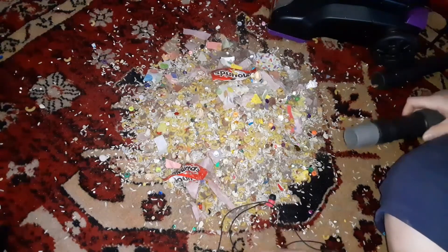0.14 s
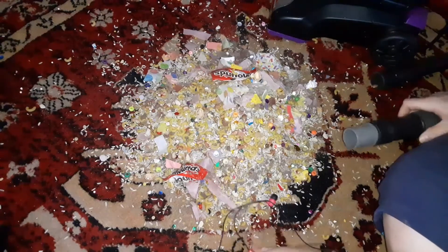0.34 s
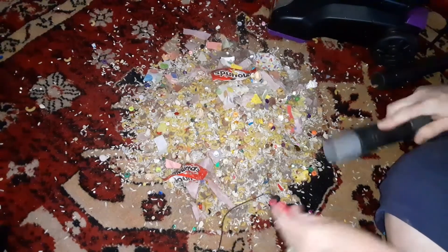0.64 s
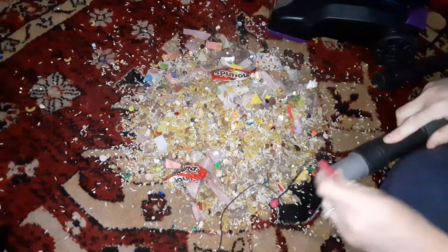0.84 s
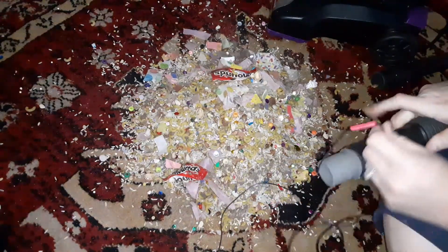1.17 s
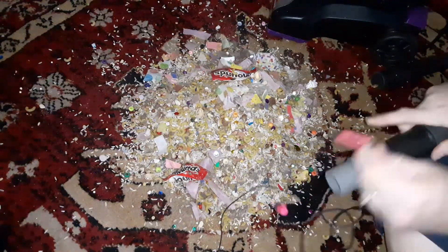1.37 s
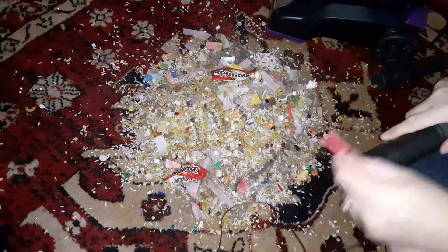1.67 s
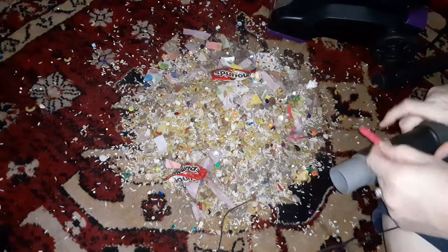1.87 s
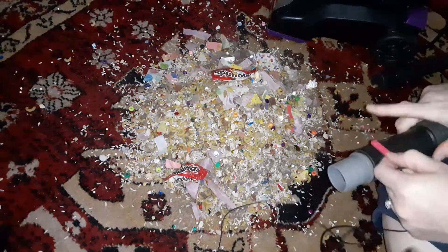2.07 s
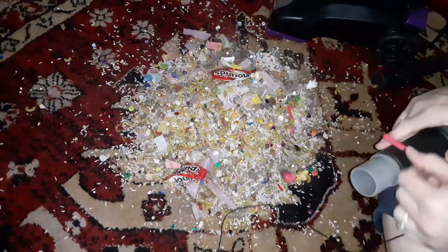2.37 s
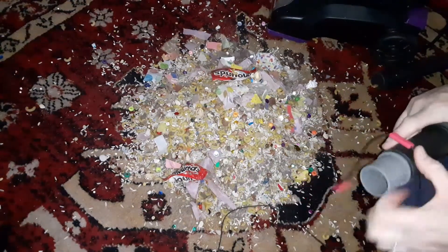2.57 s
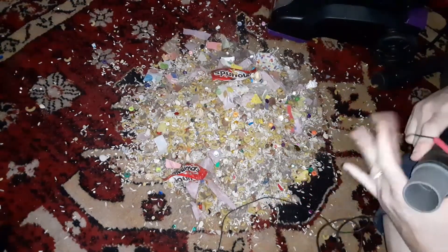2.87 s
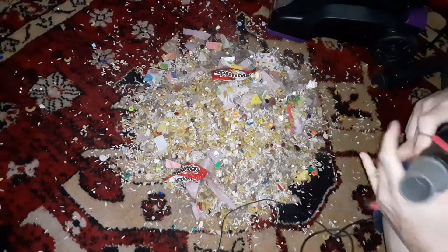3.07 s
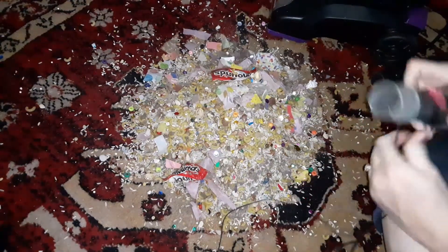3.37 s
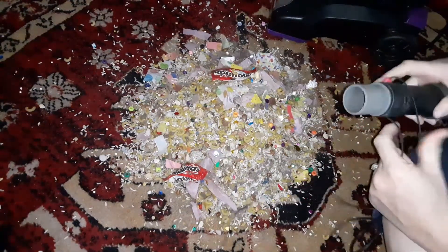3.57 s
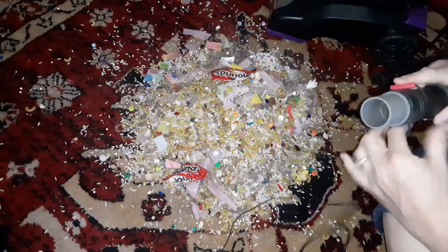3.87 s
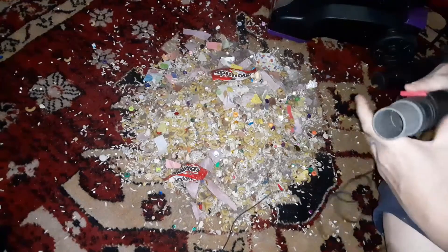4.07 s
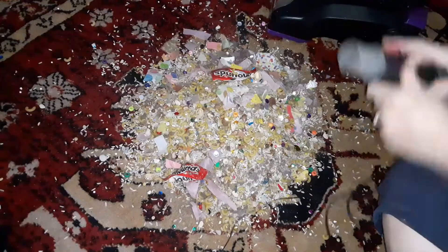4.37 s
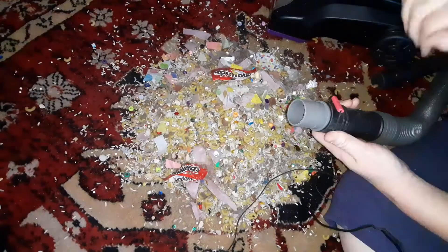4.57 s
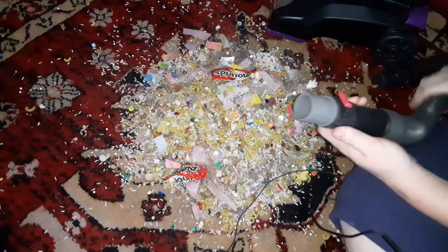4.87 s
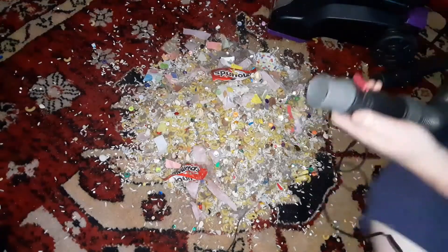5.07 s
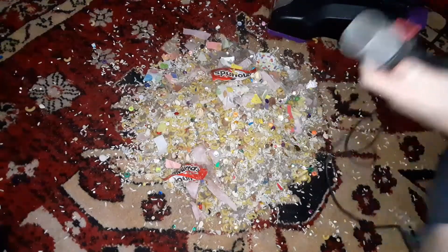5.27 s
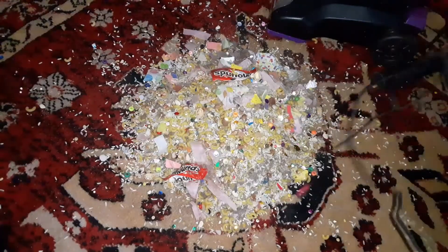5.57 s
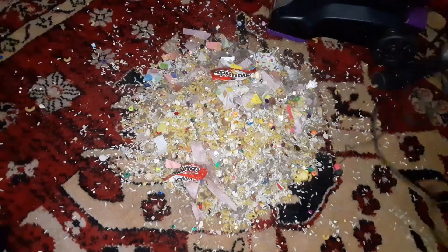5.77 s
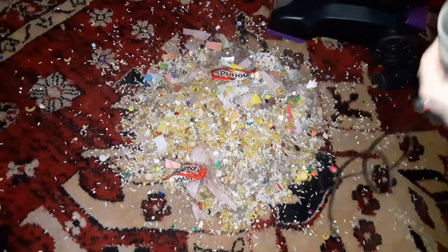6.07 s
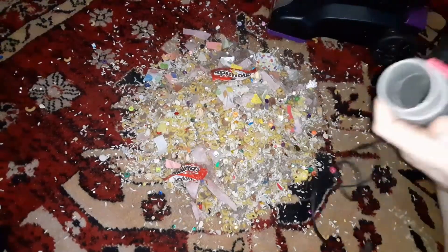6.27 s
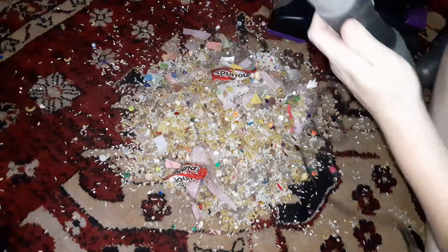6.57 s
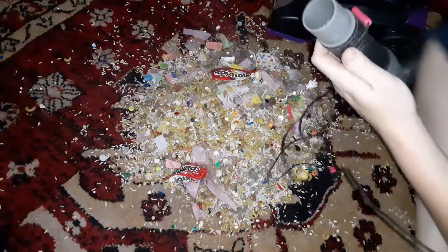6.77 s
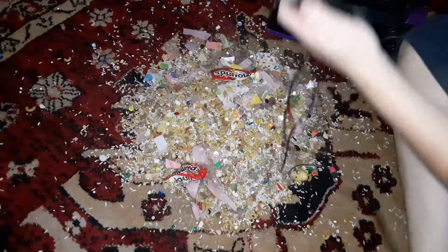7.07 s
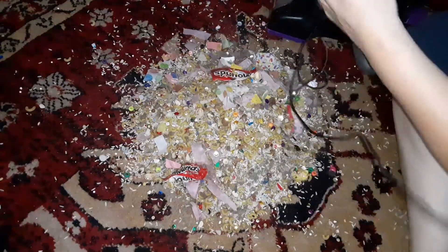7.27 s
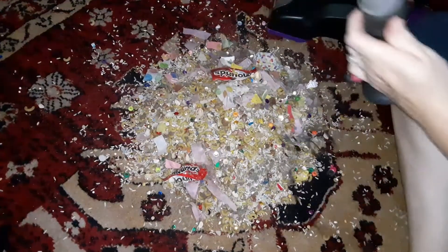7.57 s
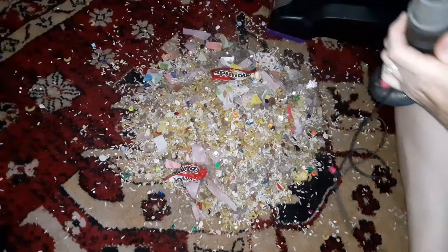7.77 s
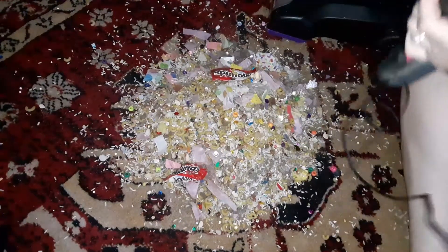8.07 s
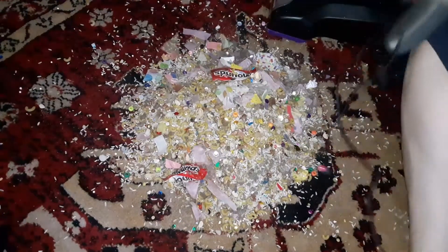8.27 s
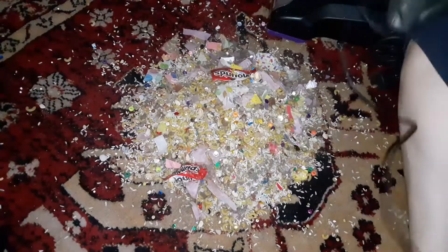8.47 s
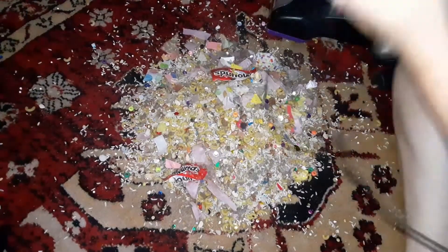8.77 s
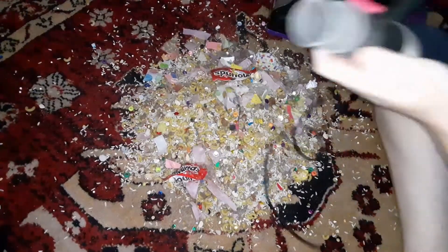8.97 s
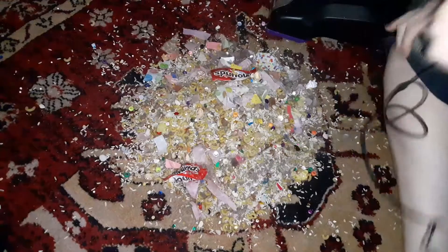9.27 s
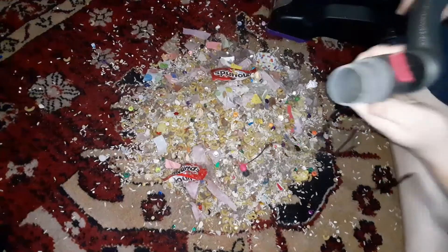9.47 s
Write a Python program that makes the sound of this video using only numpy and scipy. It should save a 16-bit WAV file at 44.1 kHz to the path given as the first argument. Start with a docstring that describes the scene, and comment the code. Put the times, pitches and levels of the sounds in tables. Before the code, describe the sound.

Close, dry, centred microphone beside an open vacuum hose. Rumble, motor hum and a thin fan whine run beneath swelling and dulling air noise. Scratchy rubs and swishes open it, sharp loud knocks punctuate the middle, and a faulty lead cuts everything with a pop. A short quieter burst comes before the full bright suction roar holds to the end.

```python
"""First comes the low rumble and hum of a cylinder vacuum cleaner on a carpet, under the hiss of its hose.
The open hose is turned about close to a small wired microphone: shaped noise swells and changes colour
as the mouth swings round, over sine tones for the motor's hum, whine and drones. Fingers rub and knock the
microphone and its lead; the contact breaks with a pop, catches briefly, then holds, and the hose roars on."""
import sys
import numpy as np
from scipy import signal
from scipy.fft import rfft, irfft, next_fast_len
from scipy.io import wavfile
from scipy.ndimage import uniform_filter1d, minimum_filter1d

SR = 44100
rng = np.random.default_rng(int(sys.argv[2]) if len(sys.argv) > 2 else 0)


def to_wav(sig):
    """Store sig (one row per channel, or 1-D mono) as 16-bit WAV at the path in sys.argv[1].

    Samples outside -1..1 are clipped; the rate is SR.
    """
    pcm = np.clip(np.atleast_2d(sig), -1, 1) * 32767
    pcm = np.round(pcm).astype(np.int16)
    wavfile.write(sys.argv[1], SR, pcm.T)  # frames by channels


N = 424669
TIME = np.arange(N) / SR  # s

# Swell half lengths below are the standard deviations of bell curves.
# how far the mouth of the hose faces the microphone: (time [s], share [0-1])
MOUTH_FACING = [(0, 0.13), (1.1, 0.2), (1.8, 0.08), (2.05, 0.92), (3.1, 0.81), (4.6, 1)]
# intake rush before level trim: (time [s], level [dB])
RUSH_LEVEL = [(0, -34), (.56, -34), (.74, -25), (1.0, -31), (1.32, -26), (1.56, -32.5), (1.84, -30),
              (2.0, -23), (2.2, -25.5), (2.92, -28.5), (3.13, -26), (3.46, -32), (3.77, -32.5), (4.42, -24),
              (7.7, -25), (9.6, -24)]
# top treble, the spray: (time [s], level [dB])
SPRAY_LEVEL = [(0, -61), (.37, -51.5), (.43, -56), (.53, -54), (.62, -39), (.85, -41), (1.3, -36),
               (1.55, -45), (1.87, -44), (1.99, -27.5), (2.2, -33), (3.15, -35.5), (3.7, -41.5),
               (4.42, -31), (5.6, -31), (6.4, -29.5), (7.4, -32), (9.6, -32.5)]
# motor rumble before level trim: (time [s], level [dB])
RUMBLE_LEVEL = [(0, -24.5), (.6, -27), (1.3, -26), (1.65, -30), (2.02, -23.5), (2.35, -26), (3.7, -27.5),
                (4.6, -23.5), (9.6, -24.5)]
# noise colours beside and in front of the mouth, relative shapes: (frequency [Hz], density [dB per Hz])
RUSH_BESIDE = [(1500, -28.5), (2000, -7), (2400, 2), (2900, -11), (3450, 0.5), (3850, -3), (4300, -2.5),
               (5000, -2), (5500, -5), (6500, -30.5)]
RUSH_IN_FRONT = [(1700, -39.5), (2250, -8.5), (2550, -1.5), (3100, -1), (3300, -2.5), (3570, -0.5),
                 (4000, -3.5), (4300, -3), (4700, -4.5), (5150, -12), (6000, -34)]
EDGE_BESIDE = [(4300, -26.5), (5200, -6.5), (5900, -1), (6600, 1.5), (7100, -9.5), (7700, -5), (8400, -13),
               (9100, -10), (9900, -15.5), (12000, -38.5)]
EDGE_IN_FRONT = [(4600, -25.5), (5400, -1), (5680, -3), (5900, 0.5), (6280, 2), (6650, 0), (7100, -6.5),
                 (7550, -8.5), (8200, -7), (8850, -4.5), (9600, -8), (11000, -30)]
SPRAY_BESIDE = [(8500, -26.5), (10000, 0), (12000, -3), (14000, -6.5), (16000, -7)]
SPRAY_IN_FRONT = [(8500, -29.5), (10000, -6.5), (11200, -4), (12700, -3), (14500, -5), (16000, -8.5)]
RUMBLE_BESIDE = [(25, -28), (50, -10.5), (130, 0), (270, -1.5), (560, 1), (1100, 5), (1600, -2.5),
                 (2100, -2), (4000, -34)]
RUMBLE_IN_FRONT = [(25, -36), (45, -13), (130, 0.5), (240, -0.5), (390, 1), (500, 2), (720, 1.5), (950, 3),
                   (1200, 2.5), (1600, 0), (2050, -1.5), (2600, -12.5), (4000, -33)]
# motor speed before flutter: (time [s], speed [turns per s])
SHAFT_SPEED = [(0, 455.2), (1.0, 455.0), (2.0, 455.2), (2.6, 454.7), (3.7, 454.6), (4.7, 455.6),
               (7.0, 455.4), (9.6, 455.0)]
# shaft hum before nodes, trim and waver: (time [s], level [dB])
HUM_LEVEL = [(0.1, -25), (1.0, -30), (2.0, -29), (2.5, -32), (3.7, -34), (4.6, -28.5), (5.5, -28),
             (7.5, -29), (8.4, -32), (9.6, -30.5)]
# nodes of the hum's standing wave that the microphone drifts through:
# (centre [s], half length [s], depth [dB])
HUM_NODES = [(1.6, 0.14, 5), (6.324, 0.24, 9.5), (9.36, 0.16, 10)]
# fan whine against the rush, before waver: (time [s], level [dB])
WHINE_AGAINST_RUSH = [(0, -9), (.65, -5.5), (1.0, -10), (1.8, -11.5), (2.65, -0.5), (2.88, -10.5),
                      (3.4, -5.5), (4.6, -13.5), (9.6, -13)]
# side tones of the motor, scaled later by the rumble level: (frequency [Hz], relative level [dB])
MOTOR_DRONES = [(59.9, -52.5), (103, -50.5), (120.1, -58.5), (205.1, -46), (410.2, -45), (615.3, -45),
                (820.5, -41.5)]
# housing resonances stirred by the air, scaled likewise:
# (centre [Hz], width [Hz], relative level [dB])
HOUSING_RESONANCES = [(719, 35, -41.5), (3610, 17, -53.5)]
# fingers passing the mouth of the hose:
# (loudest [s], half length [s], rms before the swell [dB], centre [Hz])
FINGER_SWISHES = [(0.465, .06, -30, 6200), (0.63, .015, -36, 12500), (0.712, .06, -28, 7540),
                  (0.788, 0.032, -22, 5400), (.94, .028, -34, 14000), (1.055, 0.024, -30, 11500),
                  (2.363, .026, -28.5, 12800)]
# fingers rubbing the microphone:
# (loudest [s], half length [s], rms before the swell [dB], dull above [Hz])
FINGER_RUBS = [(.4098, 0.0027, -1.5, 2970), (0.498, 0.0044, -12.5, 900), (0.573, 0.015, -19, 696),
               (1.117, 0.005, -20, 2500), (3.205, .012, -19, 2600), (3.425, .010, -20.5, 1590)]
# the lead scraping along the hose:
# (loudest [s], half length [s], rms before the swell [dB], centre [Hz])
LEAD_SCRAPES = [(.378, .009, -34, 8500), (0.558, 0.01, -20, 6500), (.579, .007, -24.5, 2800),
                (1.115, 0.0054, -19.5, 6000), (3.422, 0.011, -18, 1200), (3.423, .01, -19.5, 2600),
                (3.424, 0.01, -20, 7900), (3.488, 0.031, -23, 7900), (3.607, .014, -26.5, 7600)]
# knocks on the microphone:
# (time [s], level [dB], pitch [Hz], ring decay [cycles], crack against the ring [dB])
MICROPHONE_KNOCKS = [(0.4905, -11, 2500, 0.56, -8), (0.499, -14, 2200, .45, -8),
                     (2.3094, 10.5, 1400, 0.66, -11), (2.4233, 9, 2130, 0.75, -19),
                     (3.22, -5, 200, .5, -5.5), (3.2408, 7, 2110, 1.5, -28), (3.4438, 12, 900, 0.28, -9),
                     (3.5428, -3, 2200, .77, -9), (3.6038, 4.5, 1950, 0.86, -5.5),
                     (3.633, -11, 400, 0.68, -15), (3.674, -8, 1800, 0.58, -18),
                     (3.711, -15, 500, 0.62, -3)]
# pops of the breaking contact: (time [s], spike height [dB])
CONTACT_POPS = [(3.7709, 2.5), (3.7965, -18.5)]
# spans when the lead conducts: (from [s], to [s], gain [dB])
CONTACT_SPANS = [(0, 3.7705, 0), (4.420, 4.515, -8), (4.588, 9.7, 0)]
# gusts of the draught on the microphone: (loudest [s], half length [s], level [dB])
DRAUGHT_GUSTS = [(.92, 0.028, -38), (1.13, .03, -47), (1.98, 0.028, -38), (3.21, .025, -35.5),
                 (3.741, 0.031, -30), (7.38, 0.095, -35), (9.5, .15, -41.5)]


def intake(rush_db, edge_db, spray_db):
    """Air tears over the rim as turbulent noise; its colour changes as the mouth swings round."""
    rush = from_db(rush_db + 0.58) * hose(aimed(RUSH_BESIDE, RUSH_IN_FRONT))
    edge = from_db(edge_db + 1.34) * aimed(EDGE_BESIDE, EDGE_IN_FRONT)
    spray = from_db(spray_db) * aimed(SPRAY_BESIDE, SPRAY_IN_FRONT)
    turbulence_db = 0.48 * drift(30)
    return (rush + edge + spray) * from_db(turbulence_db)


def hose(x, round_trip_s=0.008, echo=0.14):
    """Sound runs down the hose and back, which ripples the spectrum."""
    returned = np.interp(TIME - round_trip_s, TIME, x, left=0)
    return x + echo * returned


def aimed(beside, in_front):
    """Equal-power blend of the noise colours heard beside and in front of the mouth."""
    facing = np.clip(in_time(MOUTH_FACING), 0, 1)
    return np.sqrt(1 - facing) * coloured(beside) + np.sqrt(facing) * coloured(in_front)


def rumble(level_db):
    """The motor's rumble is low noise that changes colour with the mouth of the hose."""
    return from_db(level_db - 4) * aimed(RUMBLE_BESIDE, RUMBLE_IN_FRONT)


def motor(rumble_db, rush_db, blades=9, flutter_hz=0.518):
    """The shaft hums once a turn, the fan whines once a blade, and the housing drones."""
    turn_phase = 2 * np.pi * np.cumsum(in_time(SHAFT_SPEED) + flutter_hz * drift(12)) / SR
    blade_phase = blades * turn_phase

    node_dip_db = sum(depth * bell(at, half_s) for at, half_s, depth in HUM_NODES)
    hum_db = in_time(HUM_LEVEL) - node_dip_db + 0.36
    shaft = from_db(hum_db + 0.5 * drift(11)) * np.sin(turn_phase)

    whine_db = rush_db + in_time(WHINE_AGAINST_RUSH)
    fan = from_db(whine_db + 2.4 * drift(9.6)) * np.sin(blade_phase)
    # the overtone leaves by the hose, with the rush
    overtone = from_db(rush_db - 26 + 2.4 * drift(11)) * np.sin(2 * blade_phase)

    body = np.sqrt(2) * drones() + housing()
    return np.sqrt(2) * (shaft + fan + overtone) + from_db(rumble_db + 25) * body


def drones():
    """Side tones of the motor, each a sine that wanders slightly in pitch and level."""
    out = np.zeros(N)
    for hz, db in MOTOR_DRONES:
        phase = 2 * np.pi * np.cumsum(hz + 0.52 * drift(5.54)) / SR
        out += from_db(db + 1.2 * drift(1.5)) * np.sin(phase)
    return out


def housing():
    """Air stirs the housing resonances: noise in narrow peaks."""
    out = np.zeros(N)
    for centre, width, db in HOUSING_RESONANCES:
        out += from_db(db) * noise(lambda hz: 1 / (1 + ((hz - centre) / width) ** 2))
    return out


def swishes():
    """A finger across the mouth squeezes the air into a brief narrow hiss."""
    edges = 2 ** np.array([-0.4, 0.4])  # a band 0.8 octave wide
    out = np.zeros(N)
    for at, half_s, db, hz in FINGER_SWISHES:
        out += stroke(at, half_s, db, lambda x: butter(x, hz * edges, "band"), grain_db=2.5)
    return out


def handling():
    """Touch on the microphone and lead carries straight in, without its deepest bass."""
    return butter(rubs() + scrapes() + knocks(), 45, "high")


def rubs(thump_db=3, thump_hz=135, thump_cycles=0.84):
    """Dull friction noise, each rub ending in a thump that is stronger after a longer rub."""
    out = np.zeros(N)
    for at, half_s, db, hz in FINGER_RUBS:
        def dull(x):
            """A gentle band with the treble taken off."""
            return butter(butter(x, [110, hz], "band", order=1), 5500, "low")
        out += stroke(at, half_s, db, dull)
        push = half_s / 0.01  # 1 for a half length of 10 ms
        out += from_db(db + thump_db) * push * ring(at + half_s, thump_hz, thump_cycles)
    return out


def scrapes(top_hz=10300):
    """The lead against the hose gives bright bands of friction noise."""
    out = np.zeros(N)
    for at, half_s, db, hz in LEAD_SCRAPES:
        def bright(x):
            """A band around the centre with a steep top."""
            band = butter(x, [hz / 1.48, hz * 1.36], "band", order=3)
            return butter(band, top_hz, "low", order=8)
        out += stroke(at, half_s, db, bright)
    return out


def knocks(crack_s=0.0013):
    """Each knock is a quickly dying ring with a shorter or longer decay and a crack of noise."""
    out = np.zeros(N)
    crackle = rms_one(butter(rng.standard_normal(N), [3000, 9000], "band"))
    for at, db, hz, cycles, crack_db in MICROPHONE_KNOCKS:
        crack = crackle * (TIME >= at) * np.exp(-np.clip((TIME - at) / crack_s, 0, 20))
        out += from_db(db) * (ring(at, hz, cycles) + from_db(crack_db) * crack)
    return out


def stroke(at, half_s, db, colour, grain_db=1.6):
    """A short swell of stick-slip friction: noise with an uneven grain, then filtered."""
    near = np.abs(TIME - at) < 0.2
    length = np.count_nonzero(near)
    grain = rms_one(butter(rng.standard_normal(length), 500, "low"))
    friction = from_db(grain_db * grain) * rng.standard_normal(length)
    out = np.zeros(N)
    out[near] = from_db(db) * rms_one(colour(friction)) * bell(at, half_s)[near]
    return out


def ring(at, hz, cycles):
    """A struck sine whose decay time is the given number of cycles."""
    t = np.arange(SR // 10) / SR
    start = round(at * SR)
    return np.pad(np.sin(2 * np.pi * hz * t) * np.exp(-t * hz / cycles), (start, N - start - len(t)))


def pops(swing_hz=80, swing_s=0.012, swing_db=-9, settle_s=0.051, spike_s=0.00056):
    """The breaking contact jolts the input: a spike, then a low swing that soon settles."""
    out = np.zeros(N)
    for at, db in CONTACT_POPS:
        t = np.maximum(TIME - at, 0)
        decay = np.exp(-t / swing_s - (t / settle_s) ** 4)
        swing = from_db(swing_db) * np.sin(2 * np.pi * swing_hz * t) * decay
        spike = -np.exp(-t / spike_s)
        out += (TIME >= at) * from_db(db) * (swing + spike)
    return out


def draught(steady_db=-54.5):
    """Moving air buffets the microphone as low noise, faint throughout and harder in gusts."""
    gusts = sum(from_db(db) * bell(at, half_s) for at, half_s, db in DRAUGHT_GUSTS)
    buffeting = rms_one(butter(rng.standard_normal(N), [42, 170], "band"))
    return (from_db(steady_db) + gusts) * buffeting


def from_db(db):
    """Decibels to gain."""
    return 10 ** (np.asarray(db) / 20)


def rms_one(x):
    """Scale to unit rms."""
    return x / np.sqrt(np.mean(x ** 2) + 1e-20)


def in_time(rows):
    """A curve over the whole sound, its points joined by straight lines."""
    seconds, values = np.transpose(rows)
    return np.interp(TIME, seconds, values)


def bell(at, half_s):
    """A smooth swell of height 1."""
    return np.exp(-0.5 * ((TIME - at) / half_s) ** 2)


def butter(x, hz, kind, order=2):
    """Causal Butterworth filter."""
    hz = np.clip(hz, 10, 0.45 * SR)
    return signal.sosfilt(signal.butter(order, hz, kind, fs=SR, output="sos"), x + 1e-18)


def noise(gain_at):
    """Noise of unit rms whose amplitude follows a function of frequency."""
    size = next_fast_len(N)
    hz = np.maximum(np.arange(size // 2 + 1) * SR / size, 1e-3)
    return rms_one(irfft(rfft(rng.standard_normal(size)) * gain_at(hz), size)[:N])


def coloured(spectrum):
    """Unit-rms noise with a given spectrum, read on a logarithmic frequency scale."""
    points, db = np.transpose(spectrum)
    return noise(lambda hz: from_db(np.interp(np.log(hz), np.log(points), db, left=-90, right=-90)))


def drift(rate_hz):
    """Slow random wander of unit rms."""
    return noise(lambda hz: 1 / (1 + (hz / rate_hz) ** 2) / (1 + (hz / (4 * rate_hz)) ** 2))


def limiter(x, ceiling_db=0.1, release_db_per_s=380):
    """Peaks push the gain down, and it recovers in a few hundredths of a second."""
    over_db = np.maximum(20 * np.log10(np.abs(x) + 1e-9) - ceiling_db, 0)
    release_db = release_db_per_s * TIME
    held_db = np.maximum.accumulate(over_db + release_db) - release_db
    gain = minimum_filter1d(from_db(-held_db), size=17)
    return x * uniform_filter1d(gain, size=9)


def scene():
    """Intake, motor, handling and draught at one microphone, the same in both channels."""
    rumble_db = in_time(RUMBLE_LEVEL)
    rush_db = in_time(RUSH_LEVEL)
    spray_db = in_time(SPRAY_LEVEL)
    edge_db = -9 + 0.41 * rush_db + 0.3 * spray_db  # the edge hiss takes a share of each level
    air = intake(rush_db, edge_db, spray_db) + rumble(rumble_db) + swishes() + draught()
    mono = air + motor(rumble_db, rush_db) + handling()
    return np.array([mono, mono])


def record(dry):
    """The loose contact gates the sound and pops; then a limiter and a steep treble cut."""
    contact = sum(from_db(db) * ((TIME >= start) & (TIME < end)) for start, end, db in CONTACT_SPANS)
    # the contact makes at once but lets go over a few milliseconds
    fading = np.maximum(contact, butter(contact, 68, "low", order=1))
    limited = np.array([limiter(channel) for channel in dry * fading + pops()])
    # 70 dB down from 16.1 kHz
    treble_cut = signal.cheby2(20, 70, 16100, fs=SR, output="sos")
    return signal.sosfilt(treble_cut, limited)


dry = scene()
out = record(dry)
to_wav(out)
```